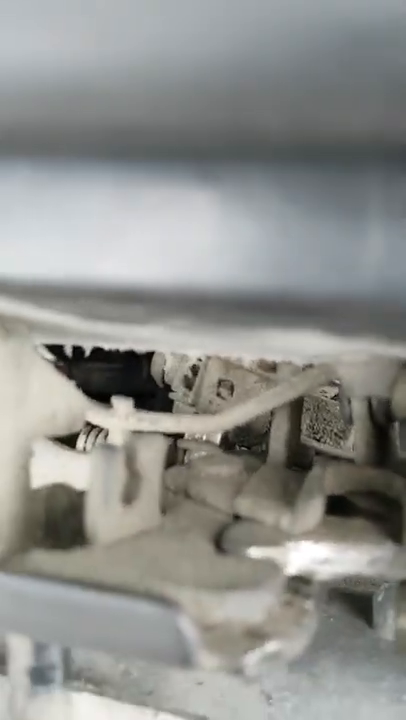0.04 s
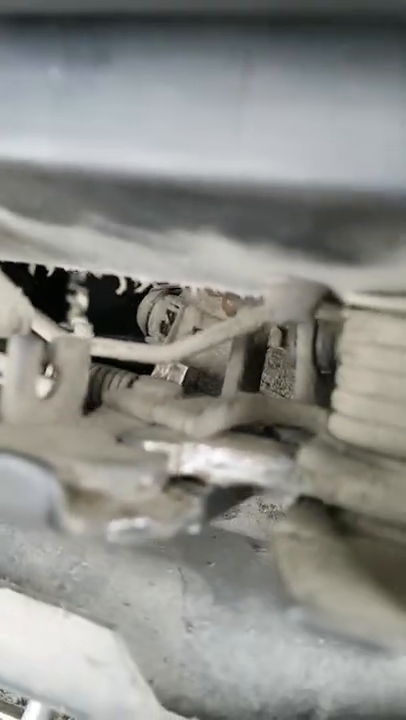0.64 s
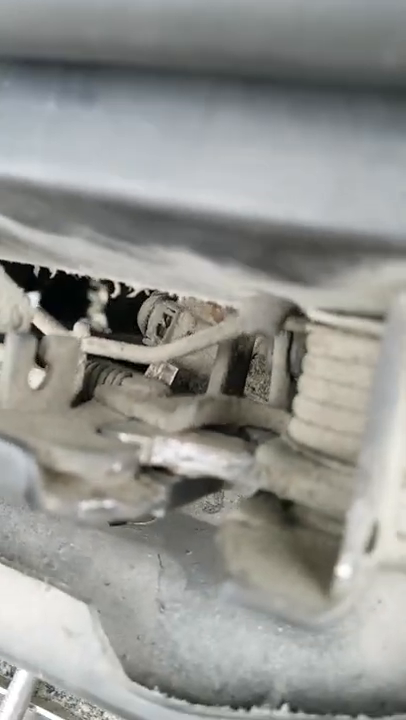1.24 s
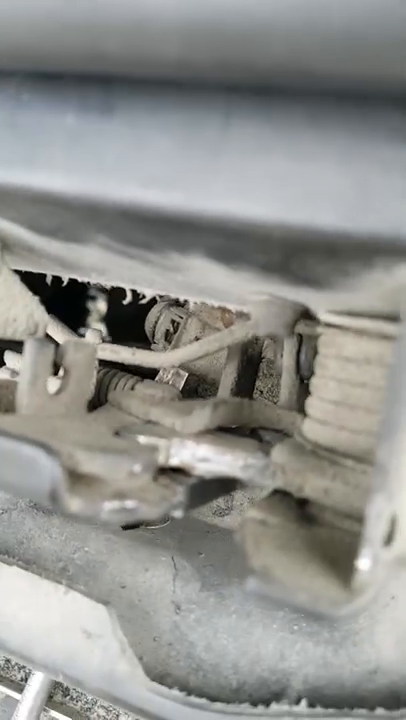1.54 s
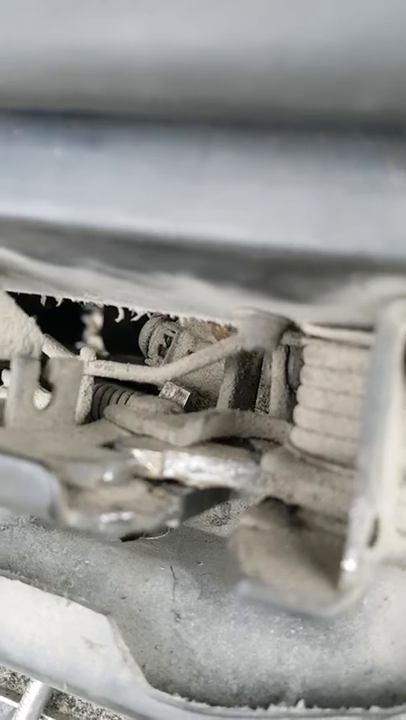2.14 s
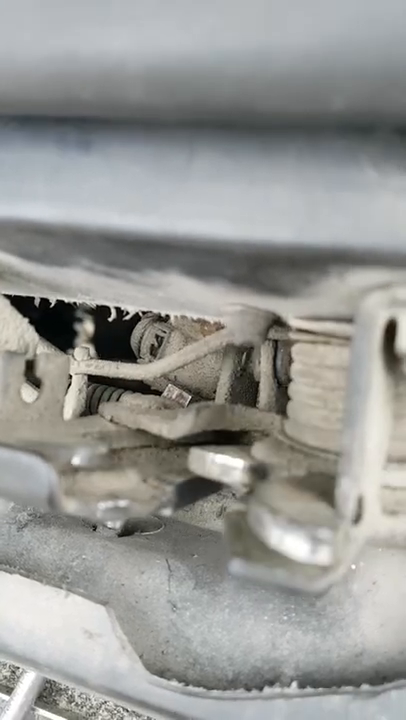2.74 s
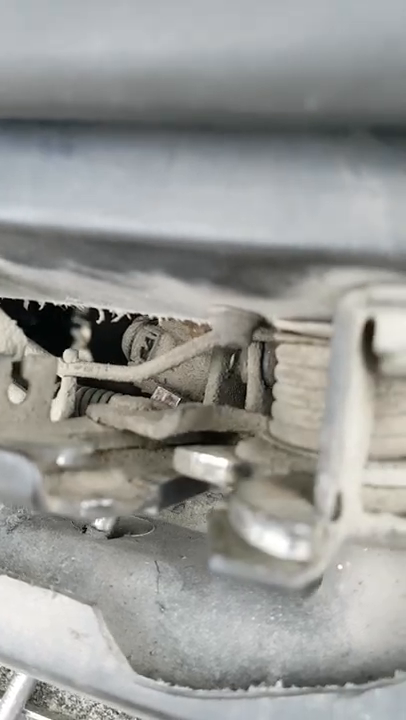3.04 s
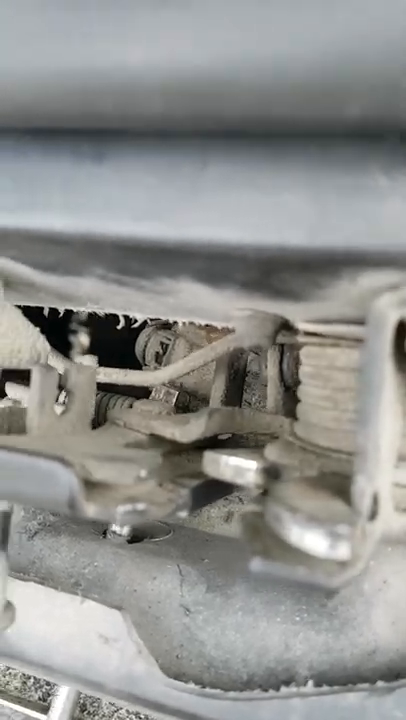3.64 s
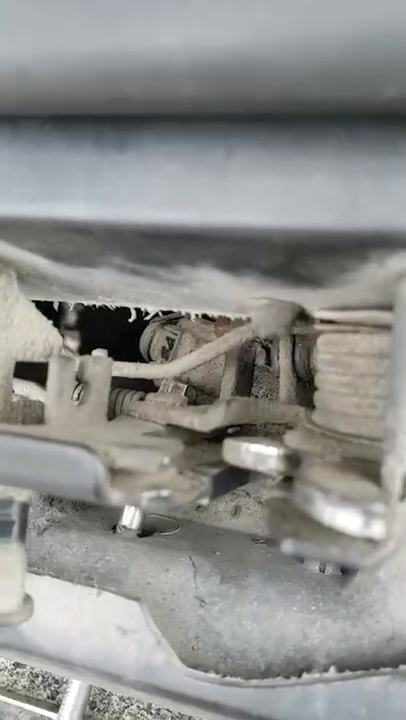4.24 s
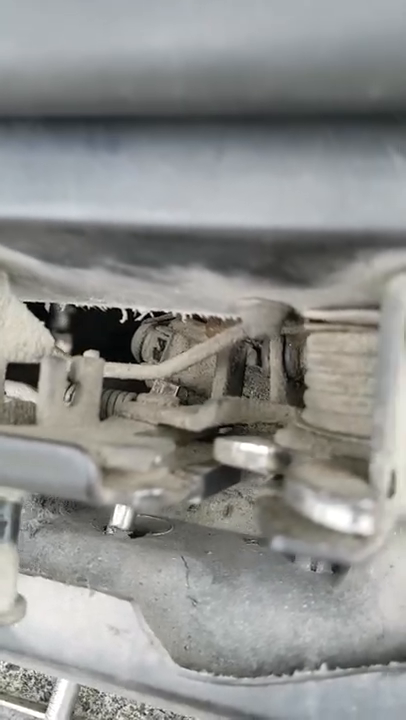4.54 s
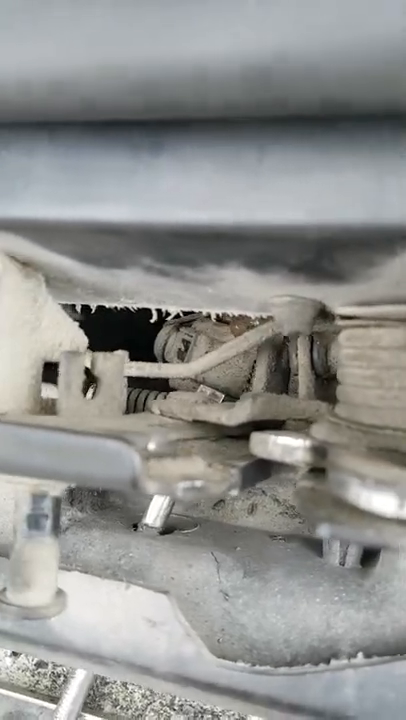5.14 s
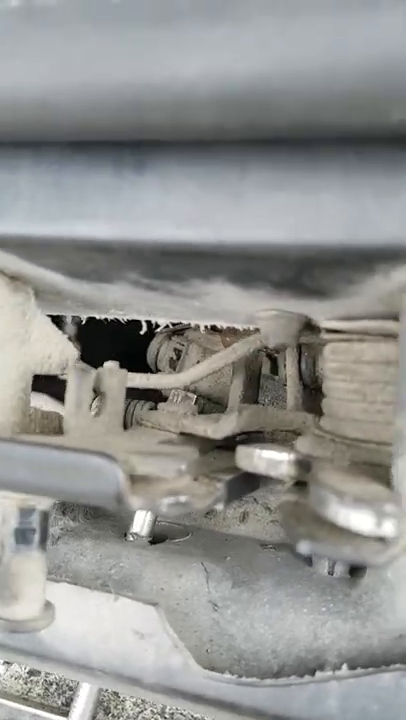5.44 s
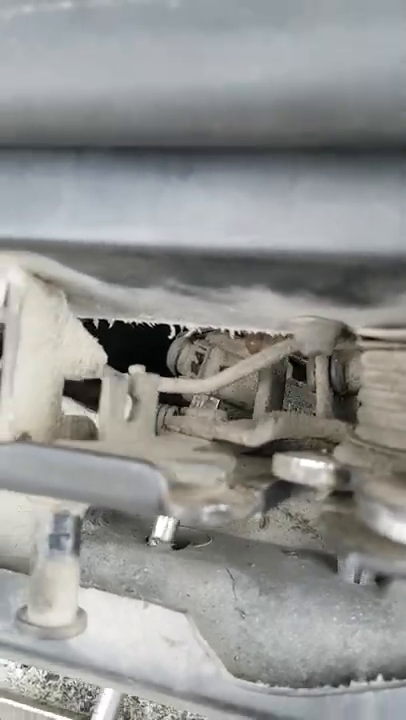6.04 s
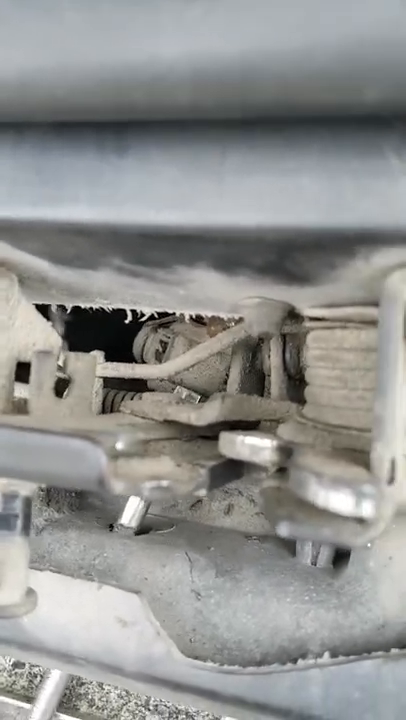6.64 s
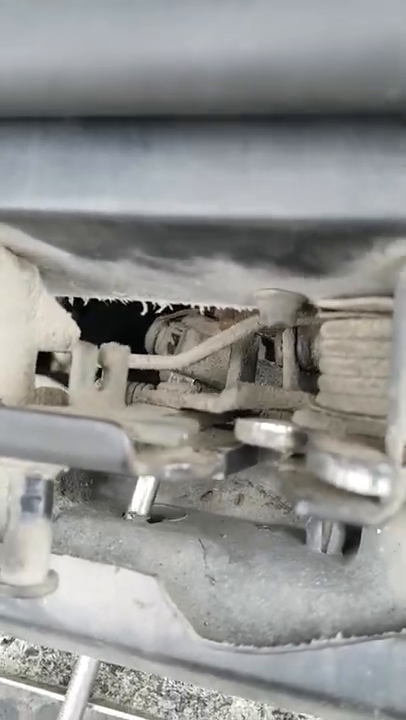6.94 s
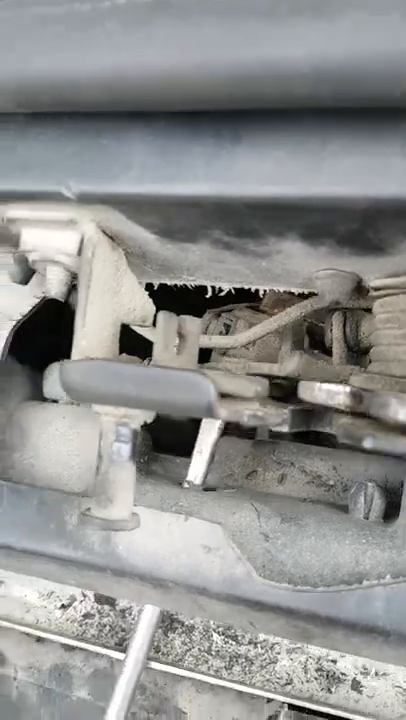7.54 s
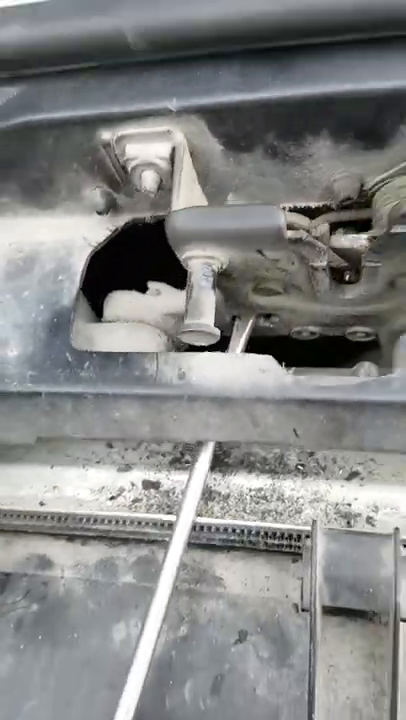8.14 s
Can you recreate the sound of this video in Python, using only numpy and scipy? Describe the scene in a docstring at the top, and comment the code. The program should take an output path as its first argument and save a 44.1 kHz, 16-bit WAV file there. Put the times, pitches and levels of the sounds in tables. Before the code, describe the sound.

Close to the microphone, a screwdriver trips a spring-loaded steel door latch: one loud, clanging snap with a tiny squeak. The freed linkage then slides back and forth, scraping softly and clicking against its stop about five times, the later clicks sharper. It is outdoors, with a faint distant traffic rumble, an idling engine, light gusts on the microphone and a small bird singing in the second half.

```python
"""A spring-loaded steel door latch, tripped by a screwdriver close by: one loud snap rings the panel.
The freed linkage then slides to and fro, scraping in its guide and clicking against its stop.
Outdoors: a small bird sings, distant traffic rumbles, an engine idles, walls echo.
Gusts and fingers brush the stereo microphone; its automatic gain ducks after the snap."""
import sys
import numpy as np
from scipy import signal
from scipy.fft import rfft, irfft, next_fast_len
from scipy.io import wavfile
from scipy.ndimage import uniform_filter1d, minimum_filter1d, map_coordinates

SR = 44100
rng = np.random.default_rng(int(sys.argv[2]) if len(sys.argv) > 2 else 0)


def file_out(sig):
    """Save sig as 16-bit WAV at sys.argv[1]."""
    # one column per channel
    cols = np.atleast_2d(sig).T
    # limit, then scale
    lim = np.clip(cols, -1, 1)
    pcm = np.round(lim * 32767).astype(np.int16)
    wavfile.write(sys.argv[1], SR, pcm)


N = 365588
TIME = np.arange(N) / SR
AGE = np.arange(SR // 2) / SR  # t/s within one event


def amp(db):
    """Decibels to gain."""
    return 10 ** (np.asarray(db) / 20)


def unit_rms(x):
    """x at rms 1."""
    return x / np.sqrt(np.mean(x ** 2) + 1e-20)


def decay(t, t60_s):
    """Exponential decay, 60 dB down at t60_s."""
    return np.exp(-np.log(1000) * t / t60_s)


def swell(peak_s, half_s, t=TIME):
    """Gaussian bell, 1/e at half_s from the peak."""
    return np.exp(-((t - peak_s) / half_s) ** 2)


def stroke(peak_s, rise_s, fall_s):
    """Triangular speed profile, peak 1."""
    return np.interp(TIME, [peak_s - rise_s, peak_s, peak_s + fall_s], [0, 1, 0])


def at_hz(points, hz):
    """Interpolate (f/Hz, value) points on a log axis."""
    knots_hz, values = np.transpose(points)
    return np.interp(np.log(hz + 1), np.log(knots_hz + 1), values)


def curves(rows, t=TIME):
    """Interpolate each column after the first over time."""
    knots_s, *columns = np.transpose(rows)
    return [np.interp(t, knots_s, column) for column in columns]


def wobble(rate_hz):
    """Smooth random curve, rate_hz knots a second."""
    knots = rng.standard_normal(int(N * rate_hz / SR) + 4)
    return map_coordinates(knots, [TIME * rate_hz])


def filtered(x, response):
    """FFT filter with gain response(hz)."""
    size = x.shape[-1]
    padded = next_fast_len(size + SR // 4)
    hz = np.fft.rfftfreq(padded, 1 / SR)
    return irfft(rfft(x, padded) * response(hz), padded)[..., :size]


def add(track, start_s, sound):
    """Mix a sound into a stereo track."""
    part = track[:, round(start_s * SR):][:, :sound.shape[-1]]
    part += sound[..., :part.shape[1]]


# Likeness of the two microphone ports: f/Hz, correlation
PORT_CORRELATION = [(60, 0.56), (180, 0.3), (530, 0.27), (1590, 0.13), (4750, 0), (14200, 0.02)]
def noise(spectrum, size=N):
    """Coloured stereo noise, rms 1: partly alike in the bass, unrelated in the treble."""
    def mid_side_gains(hz):
        angle = np.arccos(at_hz(PORT_CORRELATION, hz)) / 2
        return amp(at_hz(spectrum, hz)) * [np.cos(angle), np.sin(angle)]
    mid, side = filtered(rng.standard_normal((2, size)), mid_side_gains)
    return unit_rms(np.array([mid + side, mid - side]))


def burst(spectrum, t60_points):
    """Noise burst with a frequency-dependent decay."""
    hz, t, bins = signal.stft(noise(spectrum, size=len(AGE)), SR, nperseg=256)
    damped = bins * decay(t, at_hz(t60_points, hz)[:, None])
    return signal.istft(damped, SR, nperseg=256)[1][:, :len(AGE)]


# Self-noise: f/Hz, density/dB
HISS_SPECTRUM = [(1000, -4.5), (6000, -4), (9500, -3), (13000, 6), (14500, -2.5)]
def hiss(level_db=-77):
    """Steady microphone self-noise."""
    return amp(level_db) * noise(HISS_SPECTRUM)


# Traffic envelope, two spans: t/s, level/dB
TRAFFIC_LEVELS = [
    [(0.0, -52), (0.17, -51), (0.49, -56), (0.89, -53.5), (1.52, -62), (2.5, -60.5)],
    [(3.6, -64), (4.59, -58), (5.57, -61), (6.64, -54), (7.54, -59.5), (8.29, -57)],
]
# Low rumble: f/Hz, density/dB
RUMBLE_SPECTRUM = [(20, -21.5), (55, -11), (90, -10.5), (130, -10.5), (190, -7), (235, -7), (272, 0),
                   (305, -10.5), (350, -6), (430, -12.5), (520, -14), (800, -31.5), (1200, -60.5)]
# Airy top: f/Hz, density/dB
AIR_SPECTRUM = [(300, -10), (650, -4.5), (870, -2), (935, 5.5), (1020, -5), (1700, -5), (3000, -10.5),
                (6000, -18), (14000, -29.5)]
def traffic(rumble_gain_db=2, left_db=-2, air_db=-68.5, air_tracking=0.37):
    """Distant traffic rumbles; its airy top partly follows the level."""
    level_db, = curves(np.vstack(TRAFFIC_LEVELS))
    balance = amp([[left_db], [0]])
    rumble = amp(level_db + rumble_gain_db + 1.4 * wobble(14)) * balance * noise(RUMBLE_SPECTRUM)
    air_swing_db = air_tracking * (level_db - level_db.mean()) + 0.5 * wobble(7.8)
    return rumble + amp(air_db + air_swing_db) * noise(AIR_SPECTRUM)


# Idle envelope, two spans: t/s, level/dB
ENGINE_LEVELS = [
    [(0.0, -50), (0.36, -48.5), (0.93, -61.5), (2.5, -65.5)],
    [(3.6, -73.5), (6.56, -70), (7.41, -59.5), (8.29, -60.5)],
]
# Firing harmonics 1-3: level/dB
ENGINE_HARMONICS = [3.5, -11.5, -12]
def engine(gain_db=-2, start_hz=95.7, sag_hz_per_s=0.8, waver=0.0074, flutter_db=2.3):
    """Distant idle; the firing rate sinks as the engine warms."""
    firing_hz = (start_hz - sag_hz_per_s * TIME) * (1 + waver * wobble(5.2))
    phase = 2 * np.pi * np.cumsum(firing_hz) / SR
    hum = sum(amp(db) * np.sin(order * phase) for order, db in enumerate(ENGINE_HARMONICS, 1))
    level_db, = curves(np.vstack(ENGINE_LEVELS))
    return amp(level_db + gain_db + flutter_db * wobble(12)) * hum


# Gusts: t/s, half width/s, level/dB, left minus right/dB
WIND_GUSTS = [(0.752, 0.065, -56, 14), (1.05, 0.24, -60, 11), (4.26, 0.031, -54, -6.5),
              (4.6, 1.3, -64.5, -15), (4.984, .04, -59.5, -16), (6.014, 0.026, -57, -19),
              (7.961, 0.015, -51.5, -12), (8.093, 0.044, -47, -5.5)]
# Wind on the ports: f/Hz, density/dB
WIND_SPECTRUM = [(20, -7), (60, -2), (150, -6), (300, -11), (500, -25), (2000, -90.5)]
def breeze(lumps_db=2.5):
    """Gusts swell and ebb in lumps, mostly on the windward port."""
    force = sum(swell(s, half_s) * amp([[db + pan_db / 2], [db - pan_db / 2]])
                for s, half_s, db, pan_db in WIND_GUSTS)
    return force * amp(lumps_db * wobble(5.9)) * noise(WIND_SPECTRUM)


# Wall echoes: delay/s, spread/s, level/dB
WALL_ECHOES = [(0.069, 0.033, -2), (.28, .075, -7)]
# Reverb colour: f/Hz, density/dB
YARD_SPECTRUM = [(100, -5), (1000, -5), (1700, -4), (3100, 0.5), (3900, -1.5), (4500, -5), (5400, -3.5),
                 (7000, -3.5), (14000, -5)]
# Reverb decay: f/Hz, t60/s
YARD_T60 = [(150, 1), (1000, 0.28), (3000, 0.6), (6000, .55), (13000, .4)]
def yard(x, diffuse_db=-15):
    """Near and far walls return two echo clusters over a faint diffuse tail."""
    clusters = sum(amp(db) * swell(delay_s, spread_s, AGE) for delay_s, spread_s, db in WALL_ECHOES)
    tail = burst(YARD_SPECTRUM, YARD_T60) * (amp(diffuse_db) + clusters)
    return signal.fftconvolve(x, tail / np.linalg.norm(tail[0]), axes=1)[:, :N]


# Contour of one slur: t/s, pitch ratio, level/dB
SLUR_SHAPE = [(0, 0.99, 3), (.012, .83, 3), (.033, .77, 4), (.043, .61, 3), (.055, .51, -6.5),
              (.085, .47, 1)]
# Falling slurs: t/s, start f/Hz, level/dB
BIRD_SLURS = [(4.218, 7110, -70.5), (4.477, 7450, -62), (4.817, 7400, -58), (5.482, 7670, -56.5),
              (6.417, 7490, -57.5), (7.355, 7300, -60.5), (8.11, 7060, -60.5)]
def slurs():
    """Falling syllables, each as (t/s, pitch curve/Hz, level curve/dB)."""
    ratio, shape_db = curves(SLUR_SHAPE, AGE[AGE < SLUR_SHAPE[-1][0]])
    return [(s, hz * ratio, db + shape_db) for s, hz, db in BIRD_SLURS]


# Hooked syllables: t/s, held f/Hz, level/dB
BIRD_HOOKS = [(5.152, 4250, -55), (5.819, 4850, -50.5), (6.142, 4210, -53), (6.737, 4160, -55),
              (7.025, 4940, -55.5), (7.759, 3890, -58)]
def hooks(top_hz=7500, drop_s=0.0058, length_s=0.067, fade_db=4):
    """Syllables that drop from the top of the voice onto a held note."""
    t = AGE[AGE < length_s]
    for s, held_hz, db in BIRD_HOOKS:
        pitch_hz = held_hz + (top_hz - held_hz) * np.exp(-t / drop_s)
        yield s, pitch_hz, db + fade_db * (0.5 - t / length_s)


# Plain notes: t/s, length/s, f/Hz, level/dB
BIRD_NOTES = [(.81, 0.1, 3620, -74), (.97, 0.055, 3650, -80), (1.126, .08, 4980, -78),
              (4.594, 0.018, 4710, -60), (4.939, 0.072, 4150, -67), (5.228, 0.033, 3620, -60),
              (5.266, .045, 4420, -59), (5.918, 0.035, 5060, -54), (6.204, 0.035, 4895, -51),
              (6.804, 0.034, 4900, -58), (7.11, 0.043, 5120, -62), (7.393, .05, 3070, -63.5),
              (7.46, 0.035, 3750, -65), (7.818, .025, 4870, -62), (7.883, .04, 3930, -66),
              (8.216, .035, 4400, -66)]
def notes(scoop_depth=0.11, scoop_s=0.00654, fade_db=3):
    """Syllables that scoop up to their pitch."""
    for s, length_s, hz, db in BIRD_NOTES:
        t = AGE[AGE < length_s]
        pitch_hz = hz * (1 - scoop_depth * np.exp(-t / scoop_s))
        yield s, pitch_hz, db + fade_db * (0.5 - t / length_s)


def bird(waver=0.0179, direct_db=-6, scattered_db=-4.5, scatter_t60_s=0.073):
    """Gliding, wavering whistles, broken up by scattering from nearby surfaces."""
    direct = np.zeros((2, N))
    warble = 1 + waver * wobble(200)
    for s, hz, db in [*slurs(), *hooks(), *notes()]:
        cycles = np.cumsum(hz * np.interp(s + AGE[:len(hz)], TIME, warble)) / SR
        whistle = np.sin(2 * np.pi * (cycles + rng.random((2, 1)) / 2))
        add(direct, s, amp(db) * signal.windows.tukey(len(hz), 0.15) * whistle)
    paths = rng.standard_normal((2, len(AGE))) * decay(AGE, scatter_t60_s)
    scattered = signal.fftconvolve(direct, paths / np.linalg.norm(paths[0]), axes=1)[:, :N]
    return amp(direct_db) * direct + amp(scattered_db) * scattered


# Hand shifts: t/s, half width/s, level/dB
GRIP_SHIFTS = [(0.16, 0.19, 7.5), (8.193, 0.064, 16.5)]
# Skin friction: f/Hz, density/dB
SKIN_SPECTRUM = [(300, 14), (1200, 8.5), (3000, -8), (6000, -12), (9000, -5.5), (14000, -14)]
def rustle(gain_db=-71, grit_db=4):
    """Fingers shift on the microphone housing: faint, gritty brushing."""
    pressure = sum(amp(db) * swell(s, half_s) for s, half_s, db in GRIP_SHIFTS)
    friction = unit_rms(amp(grit_db * wobble(350)) * noise(SKIN_SPECTRUM))
    return amp(gain_db) * pressure * friction


# Dull tap by the right port: t/s, level/dB
HOUSING_TAPS = [(7.787, -21.5)]
def housing_tap(width_s=0.00025, left_db=-14):
    """One push and recoil of the housing, no ring."""
    out = np.zeros((2, N))
    u = AGE / width_s
    pulse = 2 * u * (u - 2) * np.exp(-u)
    for s, db in HOUSING_TAPS:
        add(out, s, amp(db) * amp([[left_db], [0]]) * pulse)
    return out


# Pushes that speed up until the stop halts them: peak t/s, level/dB
LINKAGE_PUSHES = [(3.263, -54.5), (5.333, -52.5), (6.126, -50.5), (6.841, -49.5), (7.54, -50.5)]
# Free slides: peak t/s, half length/s, level/dB
LINKAGE_SLIDES = [(1.7, 0.62, -80), (2.568, 0.021, -66), (4.869, .17, -58), (5.73, .1, -54.5),
                  (6.502, .09, -51.5), (7.193, 0.15, -55)]
# The guide catches and sings: peak t/s, half length/s, level/dB
GUIDE_CATCHES = [(1.105, 0.055, -71.5), (6.254, .009, -51.5), (7.415, 0.25, -57), (7.679, 0.049, -61)]
# Dry friction: f/Hz, density/dB
SCRAPE_SPECTRUM = [(300, -5), (800, -2), (1200, -4.5), (1550, -4.5), (1850, -3.5), (2150, -2.5), (2600, -9),
                   (3050, -8), (4100, -14), (5300, -14.5), (8500, -28.5), (14000, -26)]
def scraping(rise_s=0.095, halt_s=0.049, slow_db=-7, rough_db=2,
             ring_db=-3, guide_hz=1550, guide_width_hz=100):
    """Dry sliding grows with speed; its tiny slips excite one narrow resonance of the guide."""
    moves = [(stroke(s, rise_s, halt_s), db) for s, db in LINKAGE_PUSHES]
    moves += [(stroke(s, half_s, half_s), db) for s, half_s, db in LINKAGE_SLIDES]
    rub = sum(np.sqrt(speed) * amp(db + slow_db * (1 - speed)) for speed, db in moves)
    slip_drive = sum(np.sqrt(speed) * amp(db + ring_db) for speed, db in moves)
    catch_drive = sum(np.sqrt(stroke(s, half_s, half_s)) * amp(db) for s, half_s, db in GUIDE_CATCHES)
    slips = rng.standard_normal((2, N))
    guide = filtered(slips, lambda hz: (1 + 1j * (hz - guide_hz) / guide_width_hz) ** -2)
    ring = np.hypot(slip_drive, catch_drive) * unit_rms(guide)
    roughness = unit_rms(amp(rough_db * wobble(140)))
    return roughness * (rub * noise(SCRAPE_SPECTRUM) + ring)


def ringing(modes, rise_s, right_lag_s=0.00028):
    """Damped modes that build up and reach the left port first."""
    t = np.maximum(AGE - [[0], [right_lag_s]], 0)
    ring = sum(amp(db) * decay(t, t60_s) * np.sin(2 * np.pi * hz * t) for hz, db, t60_s in modes)
    return (1 - np.exp(-t / rise_s)) * ring


# Hits on the stop: t/s, level/dB, sharpness/dB, panel knock/dB
STOP_HITS = [(0.09, -43.5, -6, -1), (0.288, -50.5, -9, 25), (3.2719, -24.5, 3.5, 6.5),
             (5.3452, -23.5, 5.5, 8), (5.3618, -36, 9.5, 4), (6.1279, -23.5, 12.5, -20),
             (6.1352, 0, -36, -9.5), (6.793, -47, -14, 26.5), (6.8556, -20, 7, -8), (6.8659, -17, -23, 5.5),
             (7.5507, -23, 7, -5), (7.5583, -1, -28, -6.5), (8.115, -52, 18, 0.5), (8.199, -53, 14.5, -3)]
# Lever modes: f/Hz, level/dB, t60/s
LEVER_MODES = [(1590, -12, 0.03), (1850, -19, 0.0081), (2010, 2.5, 0.016), (2218, -5.5, 0.0077),
               (2810, -22, 0.012)]
# Panel modes: f/Hz, level/dB, t60/s
PANEL_MODES = [(297, -24.5, 0.068), (361.3, -28.5, 0.11), (464, -25, 0.082), (587.2, -25, 0.046),
               (885, -18, 0.051), (1570, -13, 0.041)]
# Contact noise: f/Hz, density/dB
TICK_SPECTRUM = [(200, -6), (600, 7), (1200, 0.5), (2500, 3.5), (4500, -7.5), (7000, -15.5), (10000, -26.5),
                 (14000, -18)]
def clicks(lever_db=8, tick_db=-14, tick_t60_s=0.024, rattle_db=-29, rattle_t60_s=0.058):
    """The linkage hits its stop: the lever rings, the panel knocks, loose parts rattle."""
    out = np.zeros((2, N))
    lever = amp(lever_db) * ringing(LEVER_MODES, rise_s=0.0039)
    panel = ringing(PANEL_MODES, rise_s=0.0075)
    rattle = amp(rattle_db) * decay(AGE, rattle_t60_s)
    for s, db, sharp_db, knock_db in STOP_HITS:
        tick = amp(tick_db + sharp_db) * decay(AGE, tick_t60_s)
        contact = (tick + rattle) * noise(TICK_SPECTRUM, size=len(AGE))
        add(out, s, amp(db) * (lever + amp(knock_db) * panel + contact))
    return out


# The claw slips as it settles: t/s, f/Hz, level/dB
CLAW_SLIP = [(2.672, 4950, -70), (2.681, 4800, -41), (2.692, 4300, -38), (2.704, 4380, -69)]
def squeak(gain_db=9, waver=0.029):
    """Steel slipping on steel: one short falling note."""
    hz, db = curves(CLAW_SLIP)
    sliding = (TIME > CLAW_SLIP[0][0]) & (TIME < CLAW_SLIP[-1][0])
    cycles = np.cumsum(hz * (1 + waver * wobble(900))) / SR
    port_cycles = np.array([[0], [0.25]])
    return sliding * amp(db + gain_db) * np.sin(2 * np.pi * (cycles + port_cycles))


# The pawl lets go, the claw slams home and chatters: t/s, level/dB
CLAW_BLOWS = [(2.6023, -12), (2.6054, 2), (2.608, 3), (2.6115, -7), (2.623, -10), (2.6295, -18.5),
              (2.662, -26)]
# Latch and panel modes: f/Hz, level/dB, t60/s
STEEL_MODES = [(207, -10, .13), (382, -10, .13), (439, -10, .15), (492, -8, .1), (562, -6, .09),
               (632, -9, .07), (750, -2, .08), (867, -2, .087), (1023, -21, .23), (1138, -6, .07),
               (1618, 0, .06), (2009, -4, .06), (2046, -26, .33), (2259, -4, .06), (2307, -5, .07),
               (2720, -6, .06), (3056, -10, .11), (3481, -12, .07), (3621, -12, .07), (4230, -11, .07),
               (4500, -30, .27), (4813, -8, .06), (8300, -20, .1), (11950, -16, .085)]
# Their dense overtones: f/Hz, density/dB
CLANG_SPECTRUM = [(40, -34.5), (90, -20), (180, -3.5), (400, -5), (750, -3), (1300, -2), (1650, -1.5),
                  (2400, -2), (3500, -8), (4700, -10), (6200, -14.5), (8200, -12.5), (10000, -16.5),
                  (14000, -12.5)]
# Overtone decay: f/Hz, t60/s
CLANG_T60 = [(150, 0.069), (500, 0.17), (1500, 0.052), (4000, 0.081), (12000, 0.081)]
def snap(ring_db=-16, ring_rise_s=0.001, clang_db=-3, crack_db=-7, crack_t60_s=0.009,
         attack_s=0.00067, low_cut_hz=110):
    """Each claw blow cracks, clangs and feeds the steel's modes; their phases differ at each port."""
    out = np.zeros((2, N))
    start_s = CLAW_BLOWS[0][0]
    blows = [(np.maximum(AGE - (s - start_s), 0), amp(db)) for s, db in CLAW_BLOWS]
    for hz, db, t60_s in STEEL_MODES:
        swing = sum(force * decay(age, t60_s) * (1 - np.exp(-age / ring_rise_s)) for age, force in blows)
        tone = np.sin(2 * np.pi * (hz * AGE + rng.random((2, 1))))
        add(out, start_s, amp(ring_db + db) * swing * tone)
    attack = 1 - np.exp(-AGE / attack_s)
    for s, db in CLAW_BLOWS:
        crack = amp(crack_db) * rng.standard_normal((2, len(AGE))) * decay(AGE, crack_t60_s)
        clang = amp(clang_db) * burst(CLANG_SPECTRUM, CLANG_T60)
        add(out, s, amp(db) * attack * (clang + crack))
    # the deep bass under the snap is cut away
    return signal.sosfilt(signal.butter(2, low_cut_hz, "high", fs=SR, output="sos"), out)


def scene(latch_send_db=-26, bird_send_db=-7):
    """Snap and far-off bird echo in the yard; the linkage stays dry inside the door."""
    latch = snap() + squeak()
    song = bird()
    linkage = clicks() + housing_tap() + scraping()
    echoes = yard(amp(latch_send_db) * latch + amp(bird_send_db) * song)
    return latch + linkage + song + echoes + rustle() + traffic() + hiss() + engine() + breeze()


def record(dry, ceiling_db=-6, hold_s=0.57, release_db_per_s=22, top_hz=14750, edge_hz=200):
    """Gain control ducks under loud sound, holds and recovers; then clipping and a steep low-pass."""
    power = np.abs(uniform_filter1d(np.mean(dry ** 2, axis=0), size=128))
    needed_db = np.minimum(ceiling_db - 10 * np.log10(power + 1e-12), 0)
    half_hold = int(hold_s * SR / 2)
    held_db = minimum_filter1d(needed_db, 2 * half_hold + 1, origin=half_hold)
    recovery_db = release_db_per_s * TIME
    gain_db = np.minimum.accumulate(held_db - recovery_db) + recovery_db
    clipped = np.clip(dry * amp(uniform_filter1d(gain_db, size=128)), -1, 1)
    return filtered(clipped, lambda hz: np.clip((top_hz - hz) / edge_hz + 0.5, 0, 1))


dry = scene()
out = record(dry)
file_out(out)
```